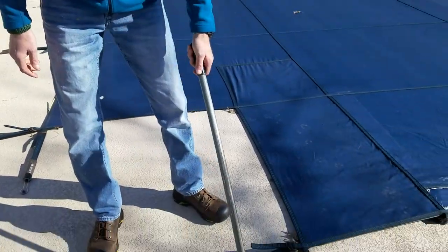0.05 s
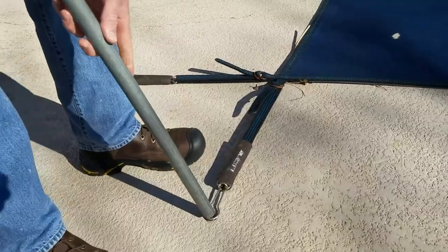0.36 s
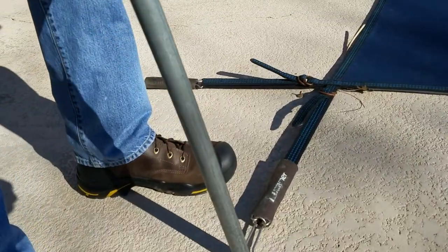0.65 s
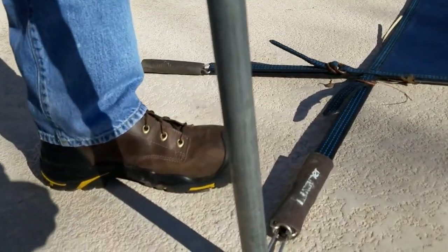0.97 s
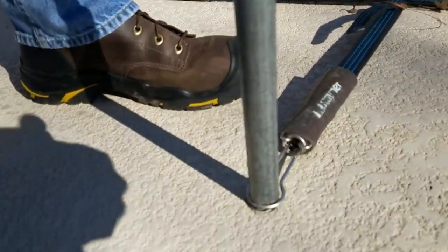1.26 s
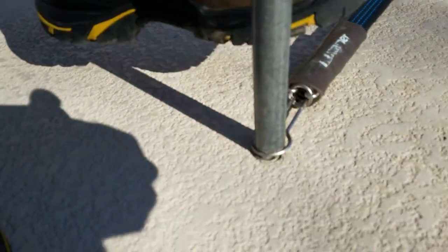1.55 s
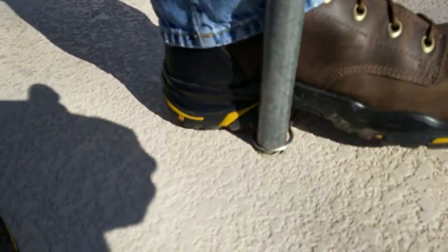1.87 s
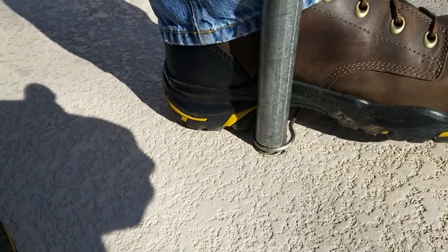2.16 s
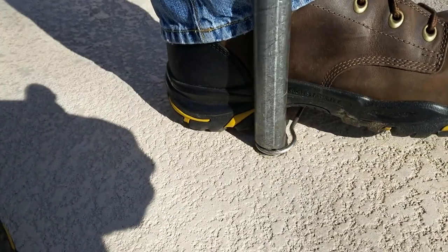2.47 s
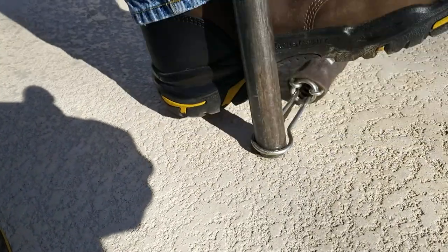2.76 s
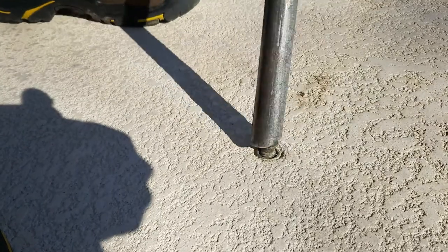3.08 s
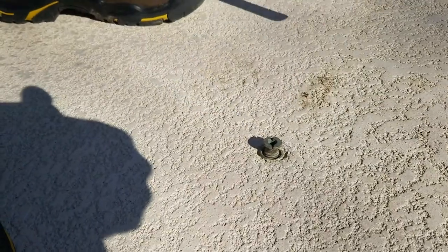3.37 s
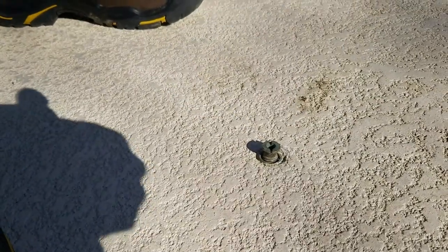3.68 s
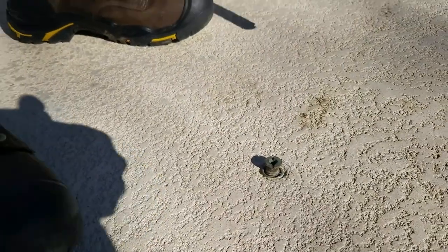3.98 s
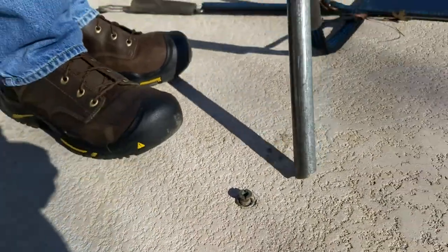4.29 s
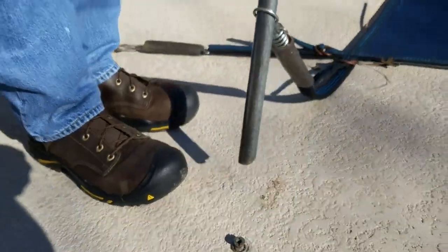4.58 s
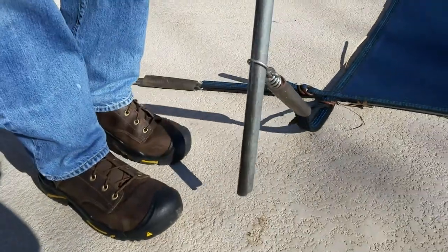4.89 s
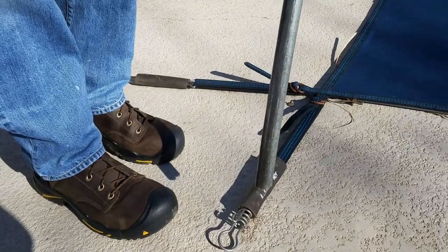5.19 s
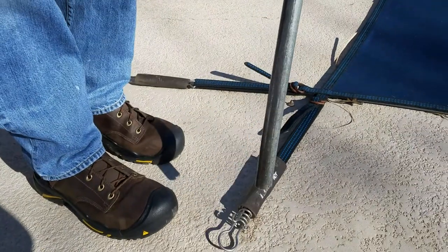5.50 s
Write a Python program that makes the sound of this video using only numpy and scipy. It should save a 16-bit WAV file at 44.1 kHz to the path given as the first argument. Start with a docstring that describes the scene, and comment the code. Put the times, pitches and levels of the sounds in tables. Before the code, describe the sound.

Metal knocks, gritty scrapes and brief squeaks as a pole levers a spring loose outdoors, with one ringing clink on concrete.

```python
"""A hollow metal pole levers a pool-cover spring off its anchor in a concrete deck.
A boot steps in, then the pole grinds round on sand in the anchor and cracks loose. The spring's hook
sticks and slips along the tube, squeaking and scraping. The pole drops on the deck with a ringing
clink and the spring slides back down. Behind it, jeans rustle and a breeze buffets the microphone."""
import sys
import numpy as np
from scipy import signal
from scipy.fft import rfft, irfft, next_fast_len
from scipy.io import wavfile
from scipy.ndimage import uniform_filter1d

SR = 44100
rng = np.random.default_rng(int(sys.argv[2]) if len(sys.argv) > 2 else 0)


def digitize_waveform(pressure):
    """Quantize a signal to 16-bit integers and store it at the path in sys.argv[1].

    Rows of a 2-D input are taken as channels; values are limited to [-1, 1].
    """
    field = np.atleast_2d(pressure).T
    bounded = np.clip(field, -1, 1)
    quanta = np.round(bounded * 32767).astype(np.int16)
    wavfile.write(sys.argv[1], SR, quanta)


N = 253398
TIME = np.arange(N) / SR
COARSE_TIME = TIME[::64]  # enough for slow curves

# Tone colours of the noises. Each row: frequency in Hz, relative strength there in dB.
AIR = [(20, -18.5), (100, -4), (220, -12.5), (1260, -16.5), (5000, -22.5), (8800, -29), (12900, -23.5),
       (16000, -20)]  # still outdoor air
WIND = [(20, -18), (60, -2.5), (100, 1), (170, -3), (280, -16), (450, -23), (1500, -38), (5000, -78)]  # low rumble of a puff
DENIM = [(500, -9.5), (2400, -8), (4500, -13.5), (7300, -7), (8600, -19.5), (12700, -2), (16000, -14.5)]  # cloth rubbing
HISS = [(700, -17.5), (2800, -3.5), (3900, -8), (5100, -12.5), (7200, -3.5), (8400, -10), (10000, -4),
        (13200, 0), (16000, -13)]  # metal sliding on metal
GRIT = [(700, -25.5), (1500, 1.5), (3300, 0.5), (5000, -5.5), (7300, -1), (8500, -11), (11000, -3.5),
        (13000, 1), (16000, -9.5)]  # sand grains snapping
CRUNCH = [(60, -21.5), (170, -17), (330, -1.5), (500, -0.5), (850, 1.5), (1300, -6), (2500, -10),
          (6000, -81)]  # dull body of crushed sand
CLICK = [(400, -8), (900, 8.5), (2600, -7.5), (4200, -5.5), (5300, -27), (7200, -10), (8700, -26),
         (9500, 0.5), (16000, -17)]  # a blow on the tube
# How alike left and right sound. Each row: frequency in Hz, likeness from 0 to 1.
STEREO_LIKENESS = [(60, 0.052), (140, 0.69), (300, 0.88), (1000, 0.55), (2200, 0.23), (7000, 0.013)]

# Puffs of breeze. Each row: middle in seconds, half length in seconds, level in dB.
PUFFS = [(.07, 0.06, -54), (.34, 0.074, -51.5), (.491, 0.0059, -36), (.555, 0.064, -45.5),
         (.75, 0.087, -52), (1.15, 0.027, -58)]
# Jeans rubbing as a leg moves. Each row: middle in seconds, half length in seconds, level in dB.
LEG_MOVES = [(.25, 0.66, -56), (.76, .12, -49.5), (1.06, 0.15, -52.5), (1.23, 0.069, -51),
             (1.45, 0.15, -57.5), (1.82, 0.032, -49.5), (4.05, 0.17, -54)]
# Scuffs of sole, cover and hook; the narrow bands sing in the tube.
# Each row: middle in seconds, half length in seconds, pitch in Hz, band width in Hz, level in dB.
SCUFFS = [(0.466, 0.017, 2150, 500, -46), (0.882, 0.026, 850, 900, -46), (3.023, 0.0061, 9300, 150, -27),
          (3.09, 0.019, 2160, 1720, -27), (3.889, 0.04, 2360, 1490, -52.5), (4.329, 0.016, 2320, 299, -31),
          (5.104, 0.021, 3280, 58.3, -36.5), (5.123, 0.029, 9350, 180, -33)]
# Boots and pole thudding on the deck.
# Each row: start in seconds, pitch in Hz, level in dB, seconds to fade by 60 dB.
THUDS = [(0.436, 493, -30.5, 0.043), (1.764, 253, -31.5, 0.028), (4.311, 148, -38.5, 0.136)]
# Bright ticks of grit and wire. Each row: time in seconds, level in dB.
TICKS = [(0.036, -41.5), (1.996, -39), (2.1274, -31.5), (2.148, -35), (2.2305, -37), (2.5014, -45),
         (2.544, -36), (2.6625, -31), (3.095, -20.5), (3.1462, -19.5), (3.358, -28), (3.441, -29.5),
         (3.928, -46), (5.123, -22), (5.153, -31)]

# Sand ground under the pole end or a boot.
# Each row: start in seconds, length in seconds, crunch level in dB, grit level in dB.
TWISTS = [(1.78, 0.15, -55.5, -52.5), (1.95, 0.086, -52.5, -63), (2.128, 0.03, -42.5, -39.5),
          (2.19, 0.06, -51, -39), (2.28, 0.14, -54, -48.5), (2.42, 0.05, -53, -43.5),
          (2.555, 0.19, -37, -36), (4.335, 0.048, -37.5, -40.5), (4.5, 0.52, -58.5, -70.5),
          (5.35, 0.17, -60.5, -59.5)]
# A twist holds almost steady, then the sand settles. In order: fade-in in seconds, growth in dB
# per second, fade-out in seconds, settling level in dB, its fall in dB per second.
TWIST_SHAPE = (0.0554, -4, 0.0023, -11, 76)
# The crunch's hollow note, higher when the pole is loaded. Each row: time in seconds, pitch in Hz.
HOLLOW_NOTE = [(2.1, 347), (2.4, 530), (2.72, 950), (4.3, 426)]
# Dull slips of the pole end in the anchor. Each row: time in seconds, level in dB, pitch in Hz.
SLIPS = [(2.5698, -23.5, 1240), (2.6575, -31.5, 760), (2.7058, -30, 1010), (2.7224, -35.5, 1995),
         (3.078, -32, 960), (5.148, -36.5, 850)]

# Squeaks of the hook. Each row: middle in seconds, half length in seconds, pitch in Hz,
# glide to either side of it in Hz, level in dB, overtone strength in dB.
SQUEAKS = [(2.9363, 0.0027, 2880, -110, -18.5, -13), (2.957, 0.0019, 2850, -40, -20, -15),
           (2.974, 0.0035, 3520, 30, -24.5, -16), (3.014, 0.0035, 3280, -110, -29, -29),
           (3.0225, 0.0016, 3070, -110, -23, 3.5), (3.0274, 0.0013, 2836, -44, -14, -1.5),
           (3.032, .003, 2850, -26, -24.5, 0), (3.045, .0016, 2800, -60, -14, -18)]
# How well the tube sends out a squeak's tones. Each row: frequency in Hz, gain in dB.
SQUEAK_COLOUR = [(3000, 0.5), (8500, 0.5), (9200, 6), (14500, -7)]
# Hook and spring sliding along the tube. Each row: start in seconds, length in seconds,
# hiss and ring levels in dB at the end of the stroke, place along the pole from 0 to 1.
SLIDES = [(3.069, 0.049, -26, -28, 0.33), (3.129, .038, -29.5, -34.5, 0.16),
          (3.201, 0.046, -43.5, -45, 0.08), (3.362, 0.039, -46, -40.5, 0.26),
          (3.424, 0.024, -39, -34.5, 0.29), (3.513, 0.046, -41.5, -35.5, .41),
          (4.23, 0.031, -72, -53, 0.26), (4.307, 0.045, -34.5, -31.5, 0.3), (4.402, .1, -34, -33.5, .41),
          (4.57, 0.051, -43.5, -49, .3), (4.684, 0.049, -43.5, -48.5, 0.27),
          (4.823, 0.022, -48.5, -47.5, 0.48), (4.887, .042, -41, -43.5, 0.41),
          (4.996, .12, -38.5, -42.5, .21), (5.141, .019, -29.5, -25, 0.22)]
# A slide gathers speed, stops, and the coils shiver on. In order: fade-in in seconds, growth in dB
# per second, fade-out in seconds, shiver level in dB, its fall in dB per second.
SLIDE_SHAPE = (0.0409, 83.5, 0.0009, -13.5, 119.5)

# High notes of the tube's wall. Each row: pitch in Hz, band width in Hz, gain in dB.
WALL_MODES = [(9228, 9, 20), (9370, 50, 12), (9600, 160, 4), (13080, 200, 1)]
# The pole's modes: the ways it bends, each with its own note. Each row: pitch in Hz,
# level in dB when struck, seconds to fade by 60 dB, level in dB when rubbed.
POLE_MODES = [(729, -6, .15, -12), (1414, 0, .29, -3), (2285, -6, .12, 1), (3310, -13, .12, -4),
              (4475, -22, .1, -6), (5740, -24, .16, -7), (7140, -26, .16, -6)]
# Knocks of pole, hook and boot; the last is a faint finger tap. Each row: time in seconds,
# body level in dB, body pitch in Hz, hardness (how many dB the crack is above the body).
KNOCKS = [(0.2733, -49, 1560, 3), (0.893, -38.5, 1020, -3), (1.7632, -40.5, 626, 0),
          (1.8494, -40.5, 905, 5), (1.856, -39, 990, -0.5), (1.9488, -45, 420, 1.5), (1.977, -48.5, 910, 3),
          (2.0148, -40.5, 403, -3), (2.345, -42, 580, -5.5), (2.417, -30, 833, -3.5),
          (2.476, -46.5, 1250, 13.5), (2.522, -44, 850, 6), (2.5383, -42, 980, -6),
          (2.5813, -23, 1424, 5.5), (2.6415, -28.5, 892, 13.5), (2.851, -47.5, 1450, -1.5),
          (3.0561, -28, 2130, 8), (3.3514, -39.5, 2180, 5.5), (3.439, -32, 2270, -4.5),
          (4.5399, -44, 1390, 9.5), (4.6396, -48.5, 445, 5.5), (5.2345, -29, 917, -4),
          (5.2379, -34, 1880, 9.5), (5.302, -38, 916, -2), (5.6776, -54.5, 1067, 11.5)]
# Ringing blows of deck and hook on the pole. Each row: start in seconds, level in dB,
# place along the pole from 0 to 1, treble tilt in dB per octave, seconds until pressure damps it.
CLINKS = [(0.4334, -15, 0.41, 3, 0.0099), (4.2836, -9, 0, 1, .12), (4.2955, -14, 0.32, 1.5, .03),
          (4.334, -20, 0.34, 2.5, 0.027), (4.5398, -34.5, 0.29, 6, .008), (5.151, -26.5, 0.1, 9, 0.08)]


def amp(db):
    """Turns decibels into a gain."""
    return 10 ** (np.asarray(db) / 20)


def unit(x):
    """Scales a signal to an average (rms) level of 1."""
    return x / np.sqrt(np.mean(x ** 2) + 1e-20)


def value_at(points, hz):
    """Joins points by straight lines on a log-frequency axis."""
    frequencies, values = np.transpose(points)
    return np.interp(np.log(hz + 1), np.log(frequencies + 1), values)


def panned(db):
    """Left and right gains; positive dB leans left."""
    return amp(np.array([[.5], [-.5]]) * db)


def add(mix, start_s, sound):
    """Adds a sound to the mix at its start time."""
    part = mix[:, max(round(start_s * SR), 0):][:, :sound.shape[1]]
    part += sound[:, :part.shape[1]]


def noise(colour, size, force=1):
    """Coloured stereo noise, pulsed by a force; the sides are most alike in the low middle range."""
    hz = np.fft.rfftfreq(size, 1 / SR)
    mid, side = rfft(rng.standard_normal((2, size)) * force) * amp(value_at(colour, hz))
    likeness = value_at(STEREO_LIKENESS, hz)
    mid, side = mid * np.sqrt(1 + likeness), side * np.sqrt(1 - likeness)
    return unit(irfft(np.array([mid + side, mid - side]), size))


def friction(per_s, spread_db, grain_s, smooth):
    """The force of rubbing: tiny bursts of uneven size on top of a smooth part."""
    size = next_fast_len(N, True)
    strength = amp(spread_db * np.minimum(rng.exponential(1, size), 3))
    bursts = strength ** 2 * (rng.random(size) < per_s / SR)
    power = signal.lfilter([1], [1, -np.exp(-1 / (grain_s * SR))], bursts)
    power /= uniform_filter1d(power, size=2200) + 1e-3 * power.mean()  # even out slow changes
    return np.sqrt(abs(power) + smooth)


def grains(colour, force):
    """Grainy rubbing noise as long as the scene."""
    return noise(colour, len(force), force)[:, :N]


def resonate(x, modes):
    """Lets a signal ring at fixed pitches, each with its own width and gain."""
    out = 0
    for hz, width, db in modes:
        r = np.exp(-np.pi * width / SR)
        feedback = [1, -2 * r * np.cos(2 * np.pi * hz / SR), r * r]
        out = out + amp(db) * signal.lfilter([1 - r, 0, r - 1], feedback, x)
    return out


def moving_resonance(x, hz, width_hz):
    """Lets a signal ring at a pitch that follows the curve hz."""
    turn = np.exp(2j * np.pi * np.cumsum(hz) / SR)
    r = np.exp(-np.pi * width_hz / SR)
    return 2 * (turn * signal.lfilter([1 - r], [1, -r], x / turn + 1e-18)).real


def drift():
    """Wanders at random between -1 and 1 over some hundredths of a second."""
    wander = unit(signal.oaconvolve(rng.standard_normal(len(COARSE_TIME)), np.hanning(60), "same"))
    return np.interp(TIME, COARSE_TIME, np.tanh(wander))


def swells(rows):
    """A loudness curve of soft, bell-shaped swells."""
    power = sum(amp(db) ** 2 * np.exp(-((COARSE_TIME - s) / half) ** 2) for s, half, db in rows)
    return np.interp(TIME, COARSE_TIME, np.sqrt(power))


def strokes(rows, shape):
    """A loudness curve per dB column: each stroke fades in, slopes, fades out and leaves a tail."""
    attack_s, growth_db_per_s, release_s, tail_db, fall_db_per_s = shape
    power = 0
    for start, length, *dbs in rows:
        attack = np.exp(-np.maximum(start - COARSE_TIME, 0) / attack_s)
        hold = amp(-growth_db_per_s * np.clip(start + length - COARSE_TIME, 0, length))
        after = np.maximum(COARSE_TIME - start - length, 0)
        release = np.maximum(np.exp(-after / release_s), amp(tail_db - fall_db_per_s * after))
        power = power + (amp(dbs)[:, None] * attack * hold * release) ** 2
    return [np.interp(TIME, COARSE_TIME, np.sqrt(p)) for p in power]


def mode_shape(k, place):
    """How strongly bending mode k moves at a place along the pole."""
    return np.cos(np.pi * ((k + 5 / 2) * place + 1 / 4))


def outdoors(air_db=-62, denim_gain_db=1):
    """Still air, rustling jeans, and lumpy puffs of wind that lean to the right."""
    air = noise(AIR, next_fast_len(N, True))[:, :N]
    denim = swells(LEG_MOVES) * grains(DENIM, friction(per_s=1700, spread_db=3, grain_s=.0005, smooth=1.5))
    breeze = swells(PUFFS) * grains(WIND, friction(per_s=60, spread_db=2.5, grain_s=.006, smooth=.5))
    return amp(air_db) * air + amp(denim_gain_db) * denim + panned(-5.5) * breeze


def scuffs():
    """Sole, cover and hook rub briefly, each a soft swell in one band of noise."""
    force = friction(per_s=900, spread_db=4, grain_s=.001, smooth=.5)
    rubbing = grains([(200, -6), (4000, 0), (12000, -14)], force)
    out = 0
    for s, half_s, hz, width_hz, db in SCUFFS:
        band = unit(resonate(rubbing, [(hz, width_hz, 0)]))
        out = out + amp(db) * band * np.exp(-((TIME - s) / half_s) ** 2 / 2)
    return out


def thud(s, hz, db, fade_s):
    """A rubber sole or the pole lands on the deck: one low note that dies fast."""
    t = np.arange(SR // 4) / SR
    return s, np.ones((2, 1)) * amp(db - 60 * t / fade_s) * np.sin(2 * np.pi * hz * t)


def impact(s, body_db, hz, crack_db, tilt_db, swell_s, body_fade_s=.027, crack_fade_s=.02):
    """A damped blow, like metal jammed on concrete: a sharp crack, two short notes and a dull thock."""
    lead_s = .015
    t = np.arange(2048) / SR - lead_s
    after = np.maximum(t, 0)
    rise = np.exp(np.minimum(t, 0) / max(swell_s, 1e-4))
    notes = sum(amp(db - 60 * after * ratio / body_fade_s)
                * np.sin(2 * np.pi * (hz * ratio * t + rng.random())) for ratio, db in ((1, 0), (2.6, -6)))
    thock = noise(CRUNCH, len(t)) * amp(-11.5 - 60 * after / .061)
    body = rise * (notes + thock)
    colour = [(f, db + tilt_db * np.log2(max(f, 1800) / 1800)) for f, db in GRIT]
    tail = amp(-22 - 60 * after / .099)
    crack = noise(colour, len(t)) * rise * (amp(-60 * after / crack_fade_s) + tail)
    core = (t > -.002) & (t < .008)  # the levels apply to these 10 ms
    sound = amp(body_db) * body / body[:, core].std() + amp(crack_db) * crack / crack[:, core].std()
    return s - lead_s, panned(-1) * sound


def tick(s, db):
    """A tiny hard contact of grit or wire: nearly all crack."""
    return impact(s, body_db=db - 19, hz=1550, crack_db=db, tilt_db=6, swell_s=.00092)


def grinding(crunch_gain_db=-2, note_gain_db=-3, grit_gain_db=-1):
    """The turning pole end crushes sand: each grain snaps and thumps at once, over a hollow note."""
    crunch_level, grit_level = strokes(TWISTS, TWIST_SHAPE)
    force = friction(per_s=200, spread_db=3.2, grain_s=.001, smooth=.35)
    note_hz = np.interp(TIME, *np.transpose(HOLLOW_NOTE))
    note = unit(moving_resonance(grains(CRUNCH, force), note_hz, width_hz=190))
    crunch = amp(crunch_gain_db) * grains(CRUNCH, force) + amp(note_gain_db) * note
    grit = amp(grit_gain_db) * grains(GRIT, force)
    return crunch_level * crunch + grit_level * grit


def squeak(s, half_s, hz, glide_hz, db, overtone_db, jitter_hz=45):
    """The hook sticks and slips on the tube: a thin, raspy chirp that rings on briefly."""
    t = np.arange(-.02, .05, 1 / SR)
    progress = t / half_s
    wobble = unit(uniform_filter1d(rng.standard_normal(len(t)), size=30))
    pitch_hz = hz + glide_hz * np.tanh(progress) + jitter_hz * wobble
    cycles = np.cumsum(pitch_hz) / SR + np.array([[.18], [0]])  # the left side runs slightly ahead
    tone = sum(amp(overtone_db * np.sqrt(k - 1) + value_at(SQUEAK_COLOUR, k * hz))
               * np.sin(2 * np.pi * k * cycles) for k in range(1, 6))
    rasp = amp(-32) * noise(HISS, len(t))
    swell = 1 / np.cosh(progress * np.where(t < 0, 1.8, 1))  # rises faster than it falls
    tail = (t > 0) * amp(-17) * np.exp(-abs(t) / .013)
    return s + t[0], amp(db) * (tone + rasp) * np.maximum(swell, tail)


def rubbed_pole(level, force, travel=.027, width_hz=55, damped_above_hz=5600):
    """The sliding hook keeps the pole ringing; its moving touch favours some modes and bends pitch."""
    path = []
    for start, length, _, _, middle in SLIDES:
        path += [(start, middle - travel / 2), (start + length, middle + travel / 2)]
    place = np.interp(TIME, *np.transpose(sorted(path)))
    drive = grains([(400, 0), (9000, 0)], force)
    ring, modes = 0, []
    for k, (hz, _, _, rubbed_db) in enumerate(POLE_MODES):
        damping = 1 + (hz / damped_above_hz) ** 3  # the hand damps the high modes most
        db = rubbed_db - 1.5 * np.log2(damping)
        push = level * (.24 + abs(mode_shape(k, place))) * drive
        bent_hz = hz * (1 + .009 * drift())
        ring = ring + amp(db) * moving_resonance(push, bent_hz, width_hz * damping)
        modes.append((hz, width_hz * damping, db))
    return ring / resonate(drive[0], modes).std()


def sliding_spring(hiss_gain_db=-2, ring_gain_db=-1, rattle_gain_db=-17):
    """Hook and coils chatter along the tube: they hiss, rattle and set the pole and its wall ringing."""
    hiss_level, ring_level = strokes([row[:4] for row in SLIDES], SLIDE_SHAPE)
    force = friction(per_s=450, spread_db=3.2, grain_s=.002, smooth=.6)
    ring = rubbed_pole(ring_level, force)
    right_to_left = panned(np.interp(TIME, [3.5, 4.7], [-3, 4]))
    hiss = hiss_level * grains(HISS, force) * right_to_left
    wall = sum(resonate(hiss * unit(amp(6 * drift())), [mode]) for mode in WALL_MODES)
    rattle = hiss_level * grains(CRUNCH, force)
    return amp(hiss_gain_db) * hiss + amp(ring_gain_db) * (wall + ring) + amp(rattle_gain_db) * rattle


def slip(s, db, hz):
    """The jammed pole gives way over a few milliseconds: a dull blow with little treble."""
    return impact(s, db, hz, crack_db=db - 1, tilt_db=-11, swell_s=.0037)


def knock(s, db, hz, hardness_db):
    """A sudden contact: the harder it is, the louder, brighter and quicker its crack."""
    extra_db = hardness_db - 4.5  # above this hardness the crack tilts towards the treble
    return impact(s, db, hz, db + hardness_db, tilt_db=.26 * extra_db, swell_s=.00029 / amp(extra_db))


def clink(s, db, place, tilt_db, free_s, click_fade_s=.057):
    """The struck pole rings, coloured by where it is hit, until pressure almost stills it."""
    t = np.arange(SR // 2) / SR
    sound = noise(CLICK, len(t)) * amp(-12 - 60 * t / click_fade_s)
    for k, (hz, struck_db, fade_s, _) in enumerate(POLE_MODES):
        phase = 2 * np.pi * rng.random() + np.array([[-.41], [.41]]) * hz / 3000  # left, right
        level = amp(struck_db + tilt_db * np.log2(hz / POLE_MODES[1][0]) - 60 * t / fade_s)
        sound = sound + mode_shape(k, place) * level * np.sin(2 * np.pi * hz * t + phase)
    attack = 1 - np.exp(-t / .00023)
    damping = .036 + 1 / np.sqrt(1 + (t / free_s) ** 12)
    return s, amp(db) * sound * attack * damping


def scene(wall_gain_db=-8):
    """Mixes everything with no echo; the short contacts also ring the lowest note of the tube's wall."""
    contacts = np.zeros((2, N))
    for source, rows in ((knock, KNOCKS), (slip, SLIPS), (tick, TICKS),
                         (clink, CLINKS), (squeak, SQUEAKS), (thud, THUDS)):
        for row in rows:
            add(contacts, *source(*row))
    wall = amp(wall_gain_db) * resonate(contacts, WALL_MODES[:1])
    return contacts + wall + grinding() + sliding_spring() + scuffs() + outdoors()


def record(dry, cutoff_hz=15950):
    """Stops peaks at full scale, then removes the very highest treble."""
    lowpass = signal.firwin(401, cutoff_hz, window=("kaiser", 9), fs=SR)
    return signal.oaconvolve(np.clip(dry, -1, 1), lowpass[None], "same")


dry = scene()
out = record(dry)
digitize_waveform(out)
```